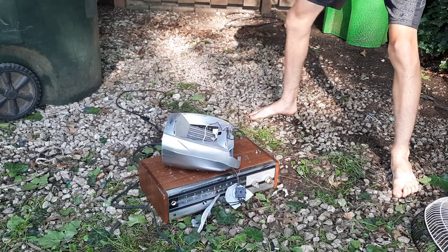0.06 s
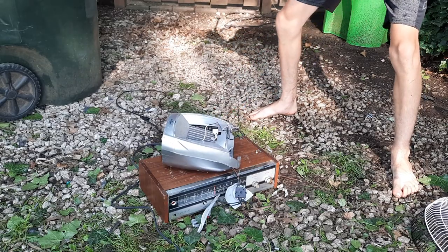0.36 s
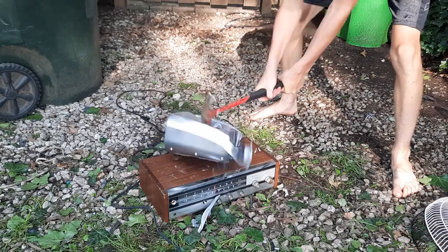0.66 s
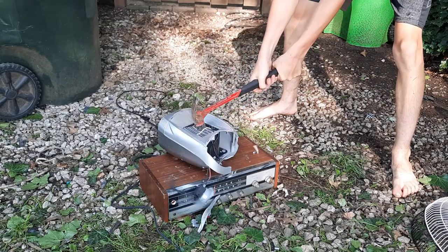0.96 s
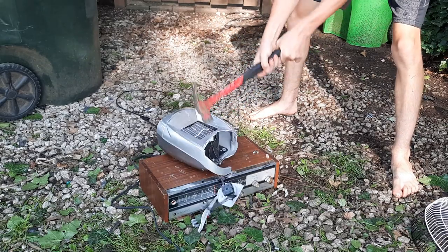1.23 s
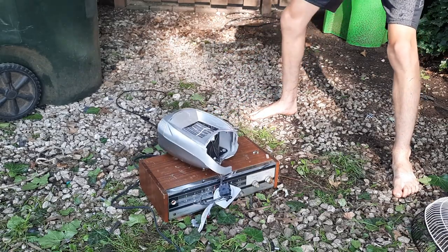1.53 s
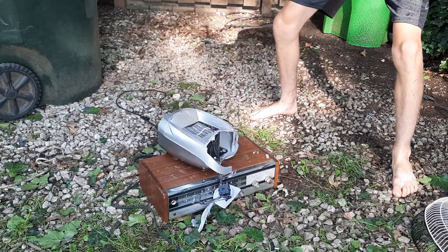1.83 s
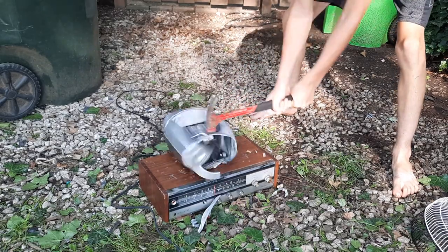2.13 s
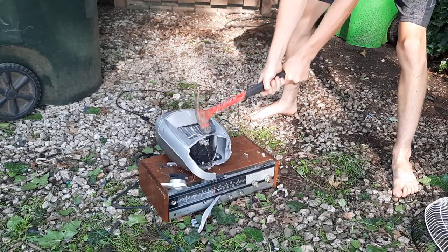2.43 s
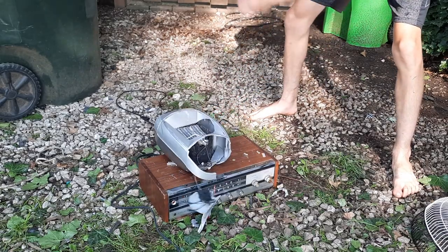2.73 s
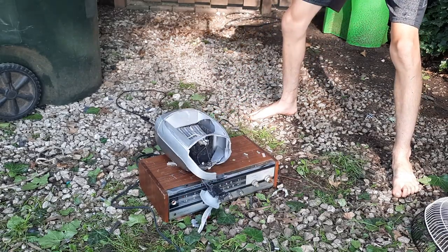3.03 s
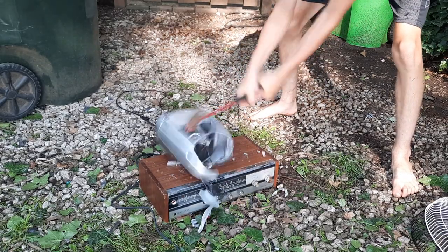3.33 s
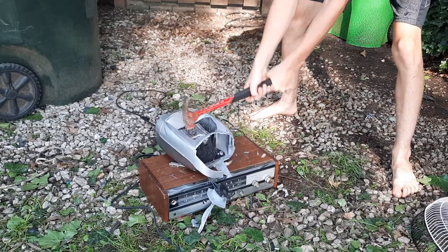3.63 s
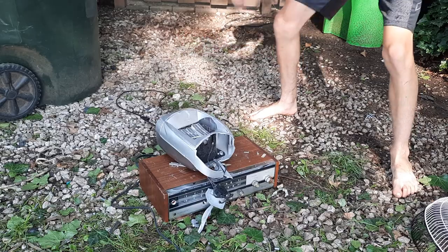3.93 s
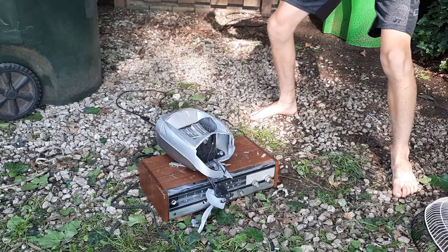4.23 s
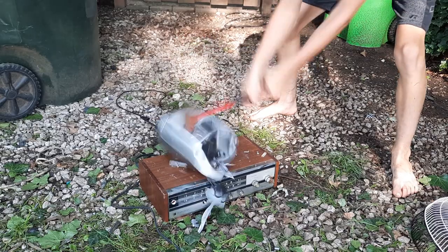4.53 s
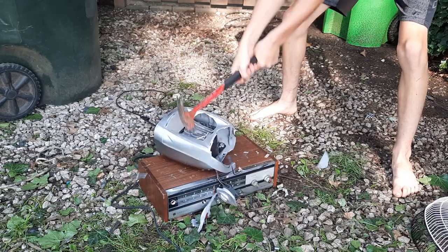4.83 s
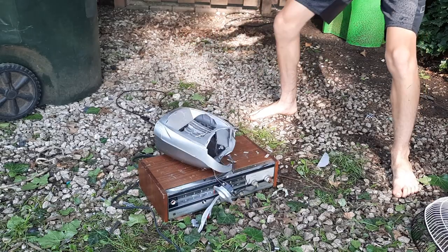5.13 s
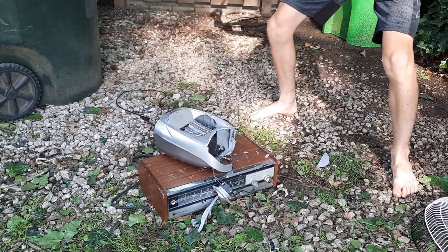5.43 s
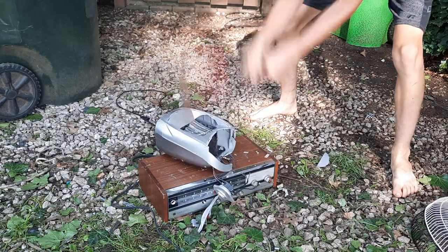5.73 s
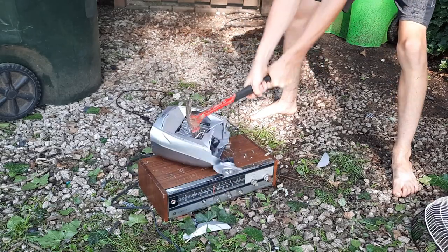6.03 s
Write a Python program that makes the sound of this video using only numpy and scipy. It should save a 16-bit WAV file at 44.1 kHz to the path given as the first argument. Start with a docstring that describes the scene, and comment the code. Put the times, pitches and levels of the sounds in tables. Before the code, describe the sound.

Close stereo microphones in a quiet yard pick up five hatchet strikes on a hollow plastic heater, a little over a second apart. Every hit cracks the housing, then the heater knocks and rocks on a wooden cabinet and plastic bits tick onto wood and gravel. The first and last two hits boom most deeply. Walls return a brief bright tail; far off are a low rumble, a hum and, at the start, very faint bird chirps.

```python
"""A hatchet strikes a plastic fan heater five times, on a wooden cabinet standing on gravel in a yard.
Heard close by, slightly left of centre, on a stereo pair of microphones: each swing rushes faintly,
then cracks the housing and booms in the hollow body; the heater hops, lands and rattles, and shards drop.
Fence and walls throw back a bright tail. Far off are a low rumble, a hum and one faint bird phrase."""
import sys
import numpy as np
from scipy import signal
from scipy.fft import rfft, irfft
from scipy.io import wavfile
from scipy.ndimage import uniform_filter1d

SR = 44100
rng = np.random.default_rng(int(sys.argv[2]) if len(sys.argv) > 2 else 0)


def generate_wav(signal):
    """Clip the signal to [-1, 1] and save it as 16-bit WAV at the path in sys.argv[1]."""
    frames = np.transpose(np.atleast_2d(signal))
    scaled = np.clip(frames, -1, 1) * 32767
    pcm = np.round(scaled).astype(np.int16)
    wavfile.write(sys.argv[1], SR, pcm)


N = 272538
EVENT_SAMPLES = 16384
T = np.arange(EVENT_SAMPLES) / SR  # time within one event [s]


def gain_of(db):
    """Decibels to gain."""
    return 10 ** (np.asarray(db) / 20)


def read(points, hz):
    """A table of (frequency [Hz], value) read on a log-frequency axis."""
    f, value = np.transpose(points)
    return np.interp(np.log(hz + 1), np.log(f + 1), value)


def unit_rms(x):
    """Scales to rms 1."""
    return x / np.sqrt(np.mean(x ** 2) + 1e-20)


def flutter(size, smooth):
    """Random wobble of rms 1, averaged over `smooth` samples."""
    return unit_rms(uniform_filter1d(rng.standard_normal(size), size=smooth))


def add(mix, s, sound):
    """Lays a sound into the mix at time s."""
    part = mix[:, max(round(s * SR), 0):][:, :sound.shape[-1]]
    part += sound[..., :part.shape[1]]


# how alike the two microphones hear a noise: (frequency [Hz], coherence [0-1])
COHERENCE = [(40, 0.8), (130, 1), (300, 0.56), (600, 0.17), (1500, 0.35), (4000, 0.08), (8000, 0.17),
             (15000, 0.091)]
def stereo_noise(colour, size):
    """Coloured noise at two closely spaced microphones, rms 1."""
    hz = np.fft.rfftfreq(size, 1 / SR)
    a, b = rfft(rng.standard_normal((2, size)))
    coherence = np.clip(read(COHERENCE, hz), 0, 1)
    mid, side = np.sqrt((1 + coherence) / 2) * a, np.sqrt((1 - coherence) / 2) * b
    return unit_rms(irfft(np.array([mid + side, mid - side]) * gain_of(colour(hz)), size))


def fade(t60, hold, rise):
    """An envelope that rises, holds while the plastic gives way, and dies; times in seconds."""
    return (1 - np.exp(-(T / rise) ** 2)) * gain_of(-60 * np.maximum(T - hold, 0) / t60)


def burst(colour, envelope, grain_db):
    """The crowded, well damped modes of plastic, fed unevenly by tiny fractures."""
    grains = gain_of(grain_db * np.clip(flutter(EVENT_SAMPLES, smooth=40), -2.5, 2.5))
    # each contact favours other pitches
    favoured = np.c_[np.geomspace(400, 16000, num=40), 2.2 * rng.standard_normal(40)]
    sound = stereo_noise(lambda hz: colour(hz) + read(favoured, hz), EVENT_SAMPLES) * grains * envelope
    return sound * np.linalg.norm(envelope) / np.sqrt((sound ** 2).sum() / 2)


def ring(modes, scatter_db, rise, pitch=1, decay=1):
    """Struck modes, varying with where the hit lands; pitch and decay multiply frequency and t60."""
    hz, db, t60 = np.transpose(np.multiply(modes, [pitch, 1, decay]))[:, :, None]
    detune, strength = rng.standard_normal((2, len(modes), 1))
    size = gain_of(db + scatter_db * strength) * (-1) ** np.arange(len(modes))[:, None]
    waves = size * gain_of(-60 * T / t60) * np.sin(2 * np.pi * hz * (1 + .005 * detune) * T)
    return waves.sum(0) / np.linalg.norm(size) * (1 - np.exp(-T / rise))


def with_panel(colour, centre_hz, lift_db, width):
    """A colour with the resonant bump of one flexing panel, as a function of frequency."""
    return lambda hz: read(colour, hz) + lift_db / (1 + ((hz / centre_hz - 1) / width) ** 2)


# colour of the open air at the microphones: (frequency [Hz], level [dB])
AIR = [(25, -21.5), (50, -9), (95, 1), (125, -7.5), (165, -2), (230, -11), (330, -14), (480, -23),
       (900, -28), (1800, -31.5), (7000, -35.5), (10000, -43.5), (13000, -39.5), (16000, -47)]
# slow drift of the ambience: (time [s], rumble level [dB], relative hiss level [dB])
AMBIENCE_DRIFT = [(0.199, -55.5, -70), (1.6, -58, -69), (2.4, -55, -64.5), (3.048, -60, -71.5),
                  (4.251, -55.5, -65), (5.35, -64, -71)]
def ambience():
    """Distant rumble and a soft hiss around the yard, each drifting in level."""
    s, *levels = np.transpose(AMBIENCE_DRIFT)
    rumble_db, hiss_db = (np.interp(np.arange(N) / SR, s, level) for level in levels)
    rumble = stereo_noise(lambda hz: read(AIR, hz) - 10 * np.log10(1 + (hz / 450) ** 4), N)
    hiss = stereo_noise(lambda hz: read(AIR, hz) - 10 * np.log10(1 + (600 / (hz + 1)) ** 4), N)
    return gain_of(rumble_db) * rumble + gain_of(hiss_db + 3.5) * hiss


# tones of the distant hum: (frequency [Hz], level [dB])
HUM_TONES = [(96, -68), (160, -67), (886, -81.5)]
def hum():
    """A few faint, far-off tones that waver in pitch and level."""
    t, out = np.arange(N) / SR, np.zeros(N)
    knots = np.linspace(0, t[-1], num=40)
    for hz, db in HUM_TONES:
        drift, swell = (np.interp(t, knots, v) for v in rng.standard_normal((2, len(knots))))
        out += gain_of(db + 2 * swell) * np.sin(2 * np.pi * np.cumsum(hz + 2 * drift) / SR)
    return out


def bird():
    """Far from the microphones, five thin, rising chirps, each a little louder."""
    start_s, every_s, chirp_s = .067, .129, .098
    from_hz, to_hz = 4900, 6900
    out, size = np.zeros((2, N)), round(chirp_s * SR)
    for k in range(5):
        hz = np.linspace(from_hz, to_hz, size) * (1 + .028 * flutter(size, smooth=60))
        chirp = np.hanning(size) * np.sin(2 * np.pi * np.cumsum(hz) / SR)
        add(out, start_s + k * every_s, gain_of(-76.5 + 2.9 * k) * chirp)
    return out


# hatchet strokes: (impact time [s], clack [dB], boom [dB], crack [dB], swing [dB], ground thump [dB],
# struck panel pitch [Hz], body pitch [Hz], crushing time [s], clack t60 [s])
STROKES = [(0.612, -14, -4.5, -20.5, -50, -21, 1054, 310.8, 0.0071, 0.17),
           (2.0, -17, -21.5, -15.5, -47, -26, 1096, 373, 0.0056, 0.24),
           (3.352, -18, -18.5, -25.5, -55.5, -26, 962, 340, 0.015, 0.22),
           (4.556, -14.5, -7, -18, -59.5, -26.5, 1042, 307.3, 0.0053, .1),
           (5.772, -14, -8, -18, -63.5, -28.5, 680, 290.7, 0.0061, 0.15)]
def swings():
    """Arms and hatchet gather speed close by: a faint rush of air that grows until the blade lands."""
    out, growth_s = np.zeros((2, N)), .16
    for s, _, _, _, swing_db, *_ in STROKES:
        rush = stereo_noise(lambda hz: read(AIR, hz), EVENT_SAMPLES) * np.exp((T - T[-1]) / growth_s)
        add(out, s - T[-1], gain_of(swing_db) * rush)
    return out


# colours of the struck housing and of plastic fracturing: (frequency [Hz], level [dB])
CLACK = [(100, -38), (250, 0), (450, 3.5), (700, -1.5), (1100, -3), (1700, -2.5), (2400, -7), (3500, -10),
         (6000, -16.5), (16000, -47)]
CRACK = [(500, -28.5), (2000, -1.5), (3500, -3), (6300, -1.5), (8300, -3), (9700, -11.5), (12000, -3),
         (15500, -7)]
# modes of grille and housing, and of the cabinet on gravel: (frequency [Hz], level [dB], t60 [s])
HOUSING_MODES = [(850, -5, 0.91), (960, 2.5, 0.36), (1050, -10.5, 0.083), (1400, -7, 0.085),
                 (1660, -9, 0.36), (2077, -15.5, 0.43), (2250, -5.5, 0.23), (2796, 1.5, 0.097),
                 (3770, -9, 0.14), (3950, -7.5, 0.35), (4600, -12, .2), (5800, -7.5, 0.65)]
GROUND_MODES = [(55, -4, 0.16), (91, -3.5, 0.22), (113, 4.5, 0.095), (160, -3, 0.36)]
# modes of a bending plastic piece and of the hollow body: (frequency [ratio], level [dB], t60 [ratio])
PIECE_MODES = [(.8, -6, .7), (.92, -3, .8), (1.0, 0, .8), (1.11, -3, .8), (1.25, -9, .6), (1.5, -15, .5)]
BODY_MODES = [(.86, -9.5, 0.93), (1.0, 7.5, 0.79), (1.14, -1.5, .9), (1.39, -6.5, 0.89), (1.62, -9, 1),
              (1.83, -12.5, 1), (2.28, -12, 0.91)]
def blows():
    """The blade crushes the shell at close range: panels ring, the body booms, the ground thumps."""
    out = np.zeros((2, N))
    fracture = lambda hz: read(CRACK, hz)
    for s, clack_db, boom_db, crack_db, _, thump_db, panel_hz, body_hz, crush_s, t60 in STROKES:
        shell = with_panel(CLACK, panel_hz, lift_db=.5, width=.058)
        # the first contact is short and hard
        bite = burst(shell, fade(t60=.038, hold=.0043, rise=.0011), grain_db=2.5)
        snap = burst(fracture, fade(t60=.022, hold=.003, rise=.0016), grain_db=4)
        add(out, s, gain_of(clack_db + .9) * bite)
        add(out, s - .0015, gain_of(crack_db + 1.6) * snap)
        # then the housing buckles and tears
        buckle = burst(shell, fade(t60, hold=crush_s, rise=.00042), grain_db=3.5)
        tear = burst(fracture, fade(t60=.16, hold=crush_s, rise=.0019), grain_db=2)
        housing = ring(HOUSING_MODES, scatter_db=-.5, rise=.00066)
        panel = ring(PIECE_MODES, scatter_db=-.5, rise=.00069, pitch=panel_hz, decay=.12)
        boom = ring(BODY_MODES, scatter_db=1, rise=.004, pitch=body_hz, decay=.115)
        thump = ring(GROUND_MODES, scatter_db=3.5, rise=.0043)
        clack = buckle + gain_of(-17) * housing + gain_of(-3) * panel
        add(out, s, gain_of(clack_db) * clack + gain_of(crack_db) * tear)
        add(out, s, gain_of(boom_db) * boom + gain_of(thump_db) * thump)
    return out


# colours of a dull plastic rattle and of a sharp tick: (frequency [Hz], level [dB])
RATTLE = [(100, -35.5), (300, -15), (500, 3.5), (900, 1), (1500, -0.5), (2300, -2.5), (3500, -16.5),
          (6000, -18), (16000, -33)]
TICK = [(500, -26.5), (2000, 1.5), (3500, 1), (6300, -2), (8300, -6), (9700, -13), (12000, -6),
        (15500, -12.5)]
CLICK_ENVELOPE = fade(t60=.035, hold=.0004, rise=.00022)
def crumbs():
    """Plastic crumbs scatter after every blow, the later ones fainter and the bigger ones duller."""
    out = np.zeros((2, N))
    wait_s, span_s, fall_db_per_s, spread_db = .03, .35, 58.5, 12.5
    for s, *_ in STROKES:
        for delay, weakness, bulk in rng.random(size=(22, 3)):
            late_s = wait_s + span_s * delay
            colour = lambda hz: bulk * read(RATTLE, hz) + (1 - bulk) * read(TICK, hz)
            db = -24.5 - fall_db_per_s * late_s - spread_db * weakness
            add(out, s + late_s, gain_of(db) * burst(colour, CLICK_ENVELOPE, grain_db=-1.5))
    return out


# the heater lands and rocks: (time [s], level [dB], hardness [0 flat side, 1 edge], body pitch [Hz])
KNOCKS = [(0.6816, -16.5, .66, 390), (0.686, -16.5, .35, 281.6), (0.721, -27, 0, 297),
          (0.9894, -24, .68, 311.5), (1.111, -38.5, 0.12, 276.5), (1.147, -36.5, .33, 283.4),
          (1.205, -47.5, .05, 310), (1.275, -46.5, .05, 300), (1.37, -43, .02, 292.6),
          (2.051, -25, 0, 306.5), (2.13, -31.5, 0.98, 443), (2.139, -22.5, 0.1, 337),
          (2.148, -30, 0.92, 349), (2.163, -26, .5, 304), (2.23, -26.5, 0.4, 296), (2.531, -47.5, 0.5, 320),
          (2.68, -43, 0, 452), (2.755, -45.5, 0.5, 281.5), (3.403, -22.5, 0.77, 340),
          (3.418, -19.5, 0.33, 296), (3.4811, -29, 0.75, 265), (3.492, -32.5, 0, 298), (3.522, -34, 0, 290),
          (3.653, -32, 0.4, 306), (4.633, -18.5, 0.5, 312.6), (4.642, -25, 0.6, 344),
          (4.688, -33.5, 0.5, 287), (4.7966, -36, 0.65, 322), (4.833, -36, 0.5, 292),
          (4.905, -39.5, 0.03, 322), (4.959, -42, 0.6, 334), (5.107, -42.5, 0.34, 293),
          (5.842, -27, 0.35, 300), (5.897, -28.5, 0.5, 301), (5.941, -22.5, 0.33, 281.5),
          (5.982, -33, .1, 394), (6.004, -27, 0.54, 439), (6.139, -41.5, 0.94, 296),
          (6.161, -39.5, 0.38, 424)]
def knocks():
    """The heater hits the cabinet; a broken edge clacks louder, higher and shorter than a flat side."""
    out = np.zeros((2, N))
    for s, db, hardness, body_hz in KNOCKS:
        by_contact = lambda flat, edge: np.interp(hardness, [0, 1], [flat, edge])
        shell = with_panel(RATTLE, by_contact(596, 1620), lift_db=5.5, width=.12)
        clack = burst(shell, fade(t60=by_contact(.19, .045), hold=.00077, rise=.0018), grain_db=1.5)
        tick = burst(lambda hz: read(TICK, hz), fade(t60=.13, hold=.0014, rise=.0011), grain_db=3.5)
        boom = ring(BODY_MODES, scatter_db=7, rise=.00079, pitch=body_hz, decay=by_contact(.17, .1))
        thud = gain_of(-18.5) * ring(GROUND_MODES, scatter_db=1.5, rise=.004)
        contact = gain_of(by_contact(-16, 3)) * clack + gain_of(by_contact(-33, 1.5)) * tick
        add(out, s, gain_of(db) * (contact + boom + thud))
    return out


# the sharpest splinters: (time [s], level [dB])
SNAPS = [(0.7572, -42), (0.8056, -32), (0.897, -47), (1.129, -48.5), (2.4027, -44), (2.4115, -41.5),
         (3.6145, -31.5), (3.6659, -34), (3.7612, -40), (4.6585, -26.5)]
def splinters():
    """Splinters of the housing snap, each with one bright click."""
    out = np.zeros((2, N))
    for s, db in SNAPS:
        add(out, s, gain_of(db) * burst(lambda hz: read(CRACK, hz), CLICK_ENVELOPE, grain_db=0))
    return out


# loose plastic dropping nearby: (time [s], clack level [dB], ring level [dB], pitch [Hz])
SHARDS = [(0.7924, -37, -28.5, 1496), (0.8215, -29, -26.5, 1970), (2.2065, -29, -55, 1550),
          (2.2318, -34.5, -40, 2120), (2.3055, -46, -41.5, 1850), (2.4472, -46, -29, 1346),
          (2.5413, -47, -53, 929), (2.5785, -53.5, -49, 1555), (3.5394, -44, -33, 1760),
          (3.5681, -41.5, -46, 1440), (3.5759, -38, -43, 1020), (3.6257, -35, -42, 1316),
          (3.6933, -45, -63, 1560), (5.0438, -55, -56, 867), (5.9409, -36.5, -25.5, 1120),
          (6.0875, -48, -39, 1514)]
def shards():
    """A loose piece ticks against wood or gravel and rings briefly in its few bending modes."""
    out = np.zeros((2, N))
    for s, clack_db, ring_db, piece_hz in SHARDS:
        piece = with_panel(RATTLE, piece_hz, lift_db=4.5, width=.14)
        clack = burst(piece, fade(t60=.065, hold=.0047, rise=.0014), grain_db=2)
        tick = burst(lambda hz: read(TICK, hz), fade(t60=.08, hold=.0013, rise=.0005), grain_db=4)
        clink = ring(PIECE_MODES, scatter_db=3, rise=.0004, pitch=piece_hz, decay=.066)
        add(out, s, gain_of(clack_db) * (clack + gain_of(-3) * tick) + gain_of(ring_db) * clink)
    return out


# pieces settling nearby: (time [s], length [s], pitch [Hz], level [dB])
SCUFFS = [(3.774, .13, 771, -53), (3.991, 0.12, 597, -61.5)]
def scuffs():
    """A piece slides a little way: a soft swell of noise around one broad resonance."""
    out = np.zeros((2, N))
    for s, length_s, slide_hz, db in SCUFFS:
        size = round(length_s * SR)
        colour = with_panel(RATTLE, slide_hz, lift_db=13, width=.25)
        add(out, s, gain_of(db) * np.hanning(size) * stereo_noise(colour, size))
    return out


# how long the yard rings: (frequency [Hz], t60 [s])
YARD_DECAY = [(100, 0.94), (300, 1), (1000, 0.33), (3000, 0.51), (7000, 0.39), (15000, .45)]
# colour of its echoes: (frequency [Hz], level [dB])
YARD_COLOUR = [(100, -10.5), (300, -18), (800, -10.5), (2000, -11.5), (5000, -7.5), (15000, -9.5)]
def yard(x):
    """Scattered echoes reach the microphones from fence, bins and walls, each band at its own decay."""
    hz, t, bands = signal.stft(rng.standard_normal((2, SR)), SR, nperseg=256)
    t60 = read(YARD_DECAY, hz)[:, None]
    bands = bands * gain_of(read(YARD_COLOUR, hz)[:, None] - 60 * t / t60)
    bands *= np.sqrt(np.log(10 ** 6) / (t60 * SR))  # a longer decay adds no energy
    onset = 1 - np.exp(-(np.arange(SR) / SR / .004) ** 2)
    tail = signal.istft(bands, SR, nperseg=256)[1][:, :SR] * onset
    return signal.fftconvolve(x, tail, axes=1)[:, :N]


# balance of the microphone pair: (frequency [Hz], left minus right [dB])
BALANCE = [(60, -1), (250, -2), (500, 2), (1000, 2), (2000, 1.1), (4000, 0.36), (8000, -0.8), (14000, 1.55)]
def scene():
    """The smashing close to the pair and slightly left of centre, with the yard around it."""
    near = blows() + crumbs() + knocks() + splinters() + shards() + scuffs()
    hz, right_lag_s = np.fft.rfftfreq(N, 1 / SR), 4.5e-5
    arrival = np.exp(-2j * np.pi * np.outer([0, right_lag_s], hz))
    direct = rfft(near + bird()) * arrival
    diffuse = rfft(yard(near) + swings() + ambience() + hum())
    return irfft((direct + diffuse) * gain_of(np.outer([.5, -.5], read(BALANCE, hz))), N)


def record(dry):
    """The deepest bass is taken away; the loudest peaks are rounded and the top treble is cut."""
    low_cut_hz, high_cut_hz = 43, 16000
    thinned = signal.sosfilt(signal.butter(4, low_cut_hz, "highpass", fs=SR, output="sos"), dry)
    rounded = thinned / (1 + thinned ** 6) ** (1 / 6)
    lowpass = signal.firwin(255, high_cut_hz, window=("kaiser", 8), fs=SR)
    return signal.oaconvolve(rounded, lowpass[None], "same")


dry = scene()
out = record(dry)
generate_wav(out)
```